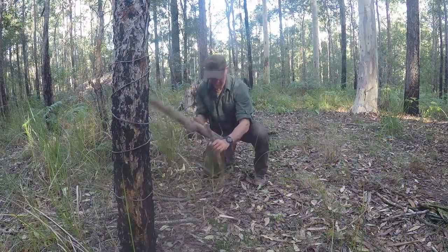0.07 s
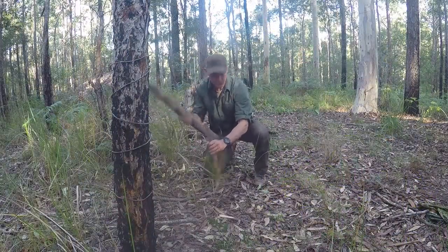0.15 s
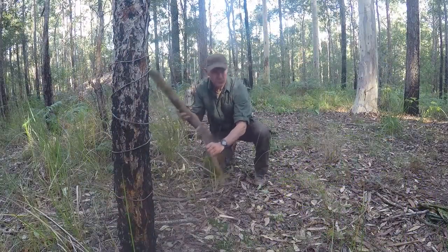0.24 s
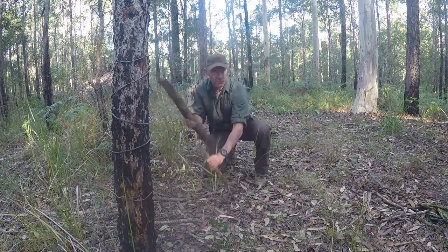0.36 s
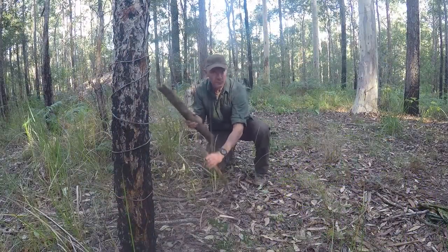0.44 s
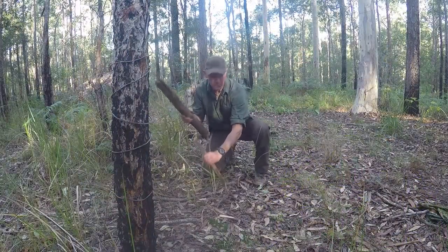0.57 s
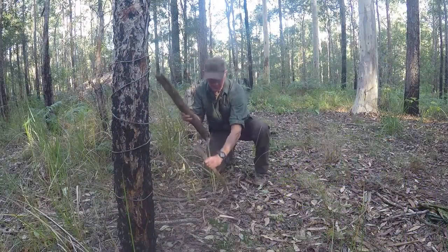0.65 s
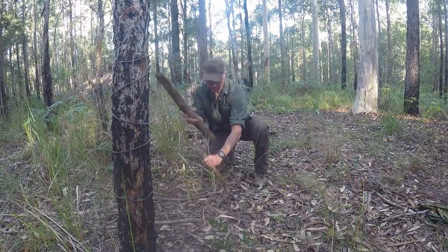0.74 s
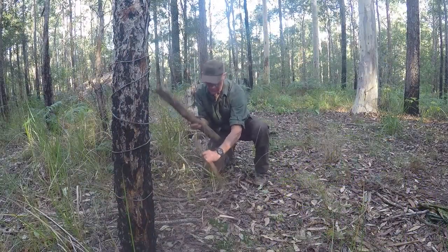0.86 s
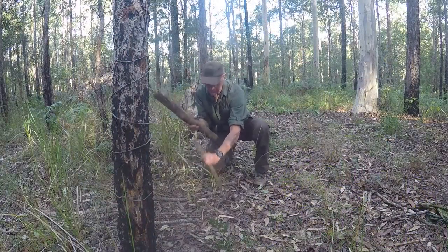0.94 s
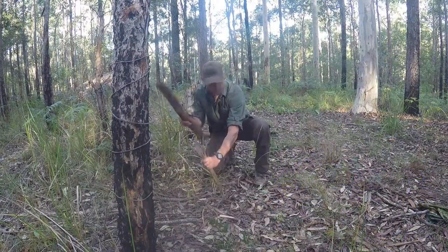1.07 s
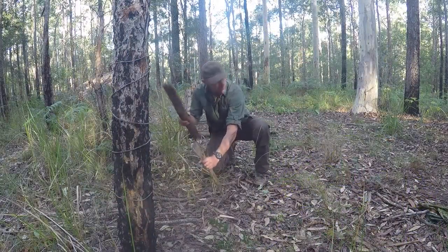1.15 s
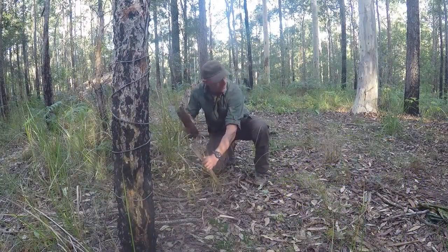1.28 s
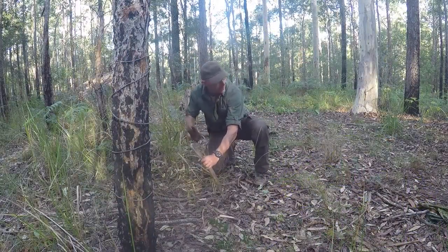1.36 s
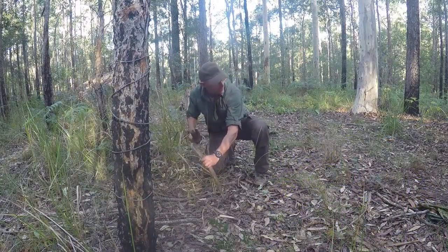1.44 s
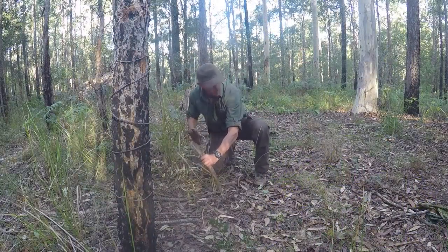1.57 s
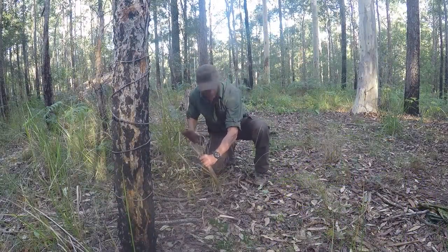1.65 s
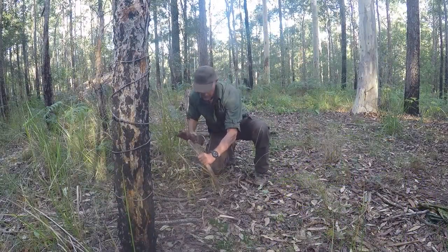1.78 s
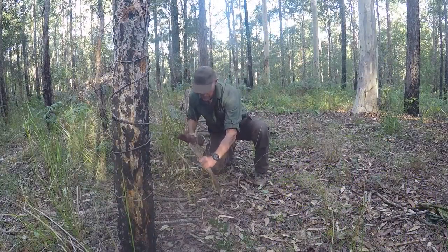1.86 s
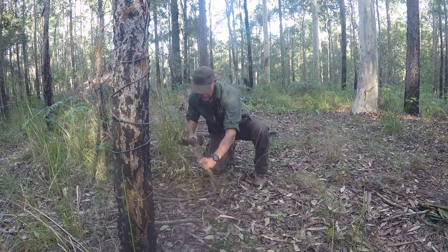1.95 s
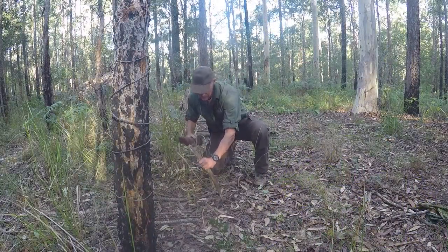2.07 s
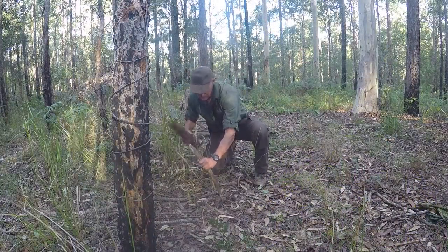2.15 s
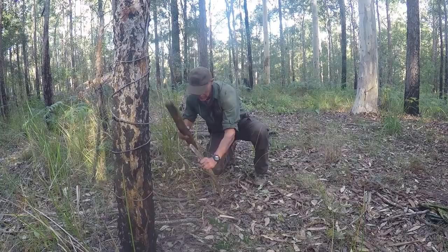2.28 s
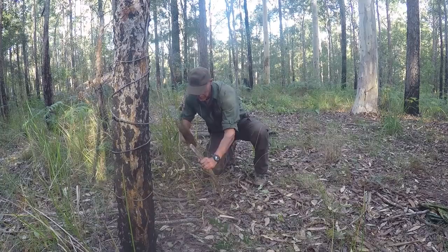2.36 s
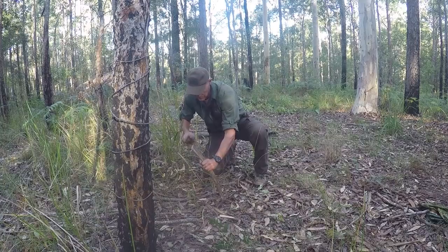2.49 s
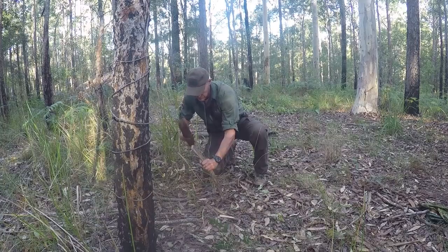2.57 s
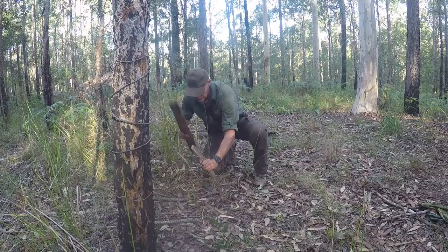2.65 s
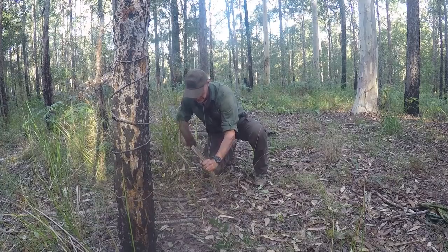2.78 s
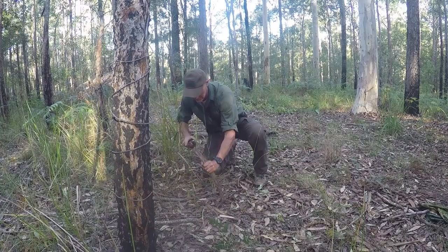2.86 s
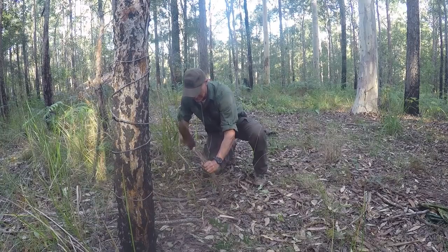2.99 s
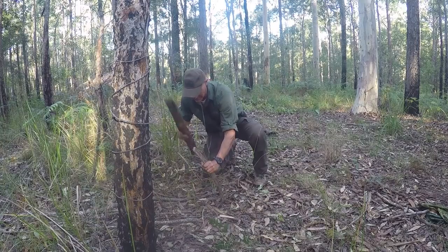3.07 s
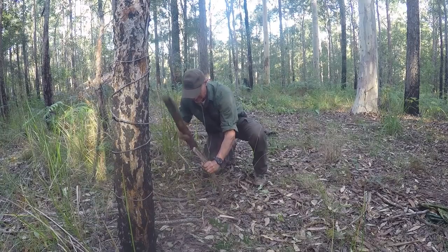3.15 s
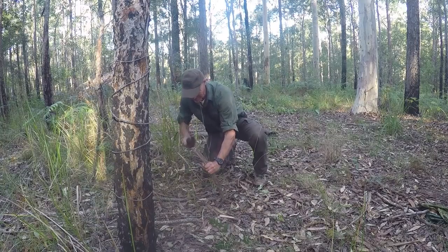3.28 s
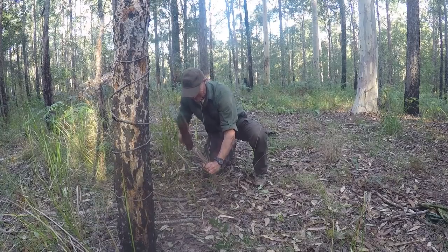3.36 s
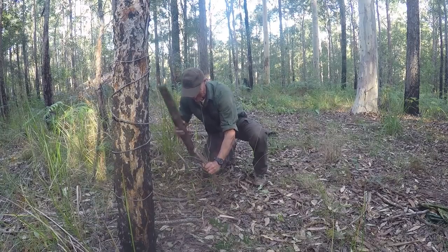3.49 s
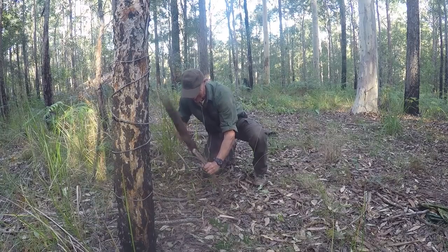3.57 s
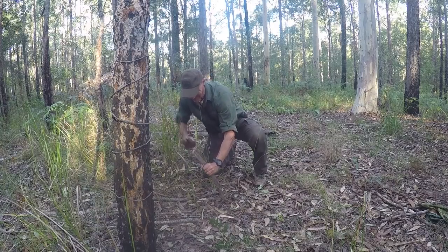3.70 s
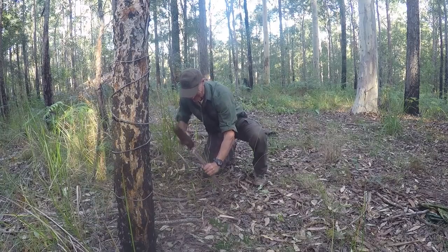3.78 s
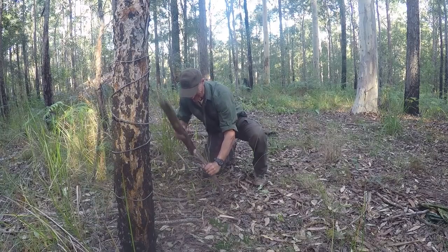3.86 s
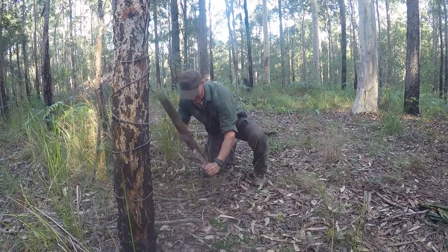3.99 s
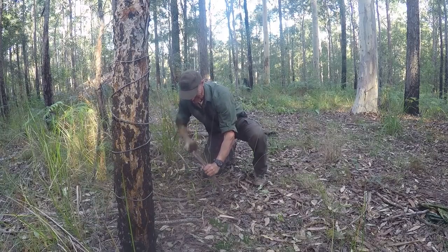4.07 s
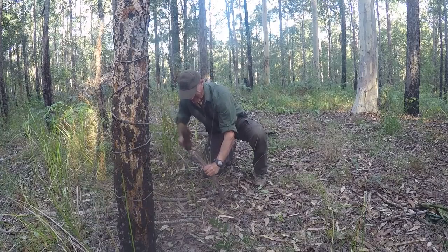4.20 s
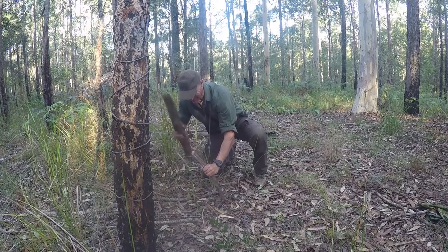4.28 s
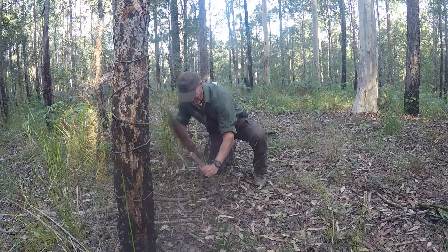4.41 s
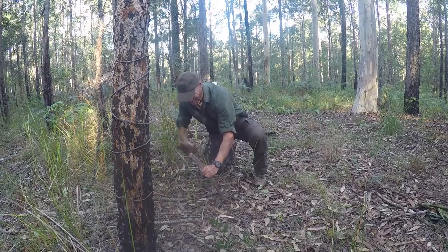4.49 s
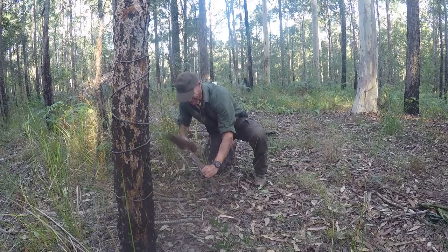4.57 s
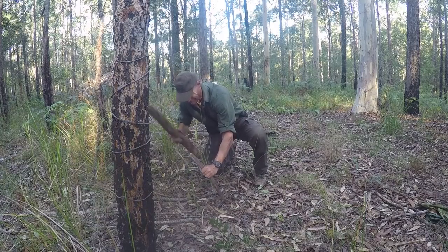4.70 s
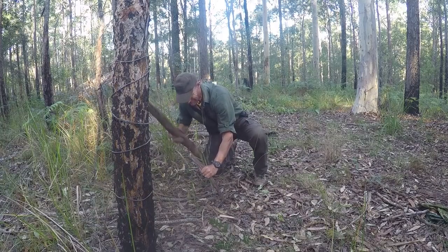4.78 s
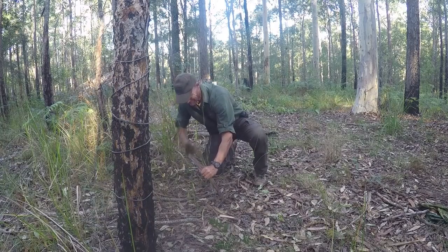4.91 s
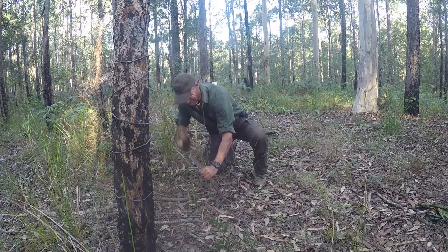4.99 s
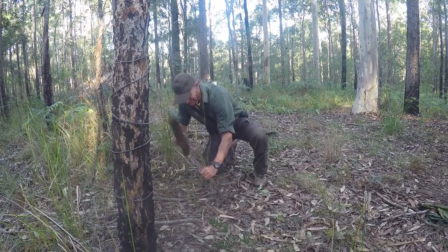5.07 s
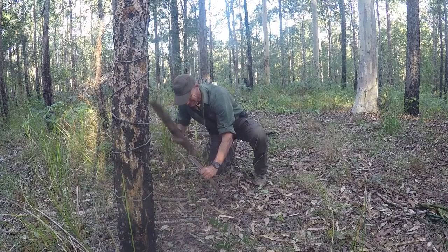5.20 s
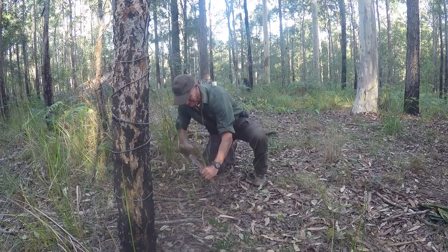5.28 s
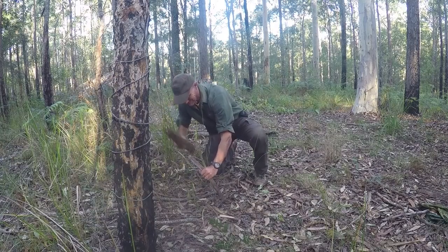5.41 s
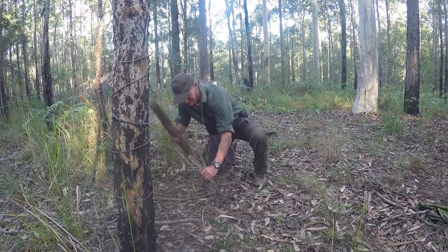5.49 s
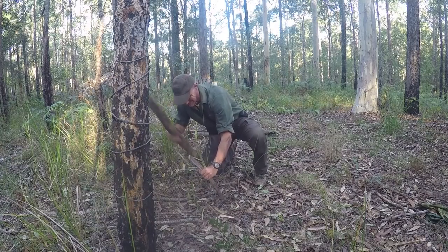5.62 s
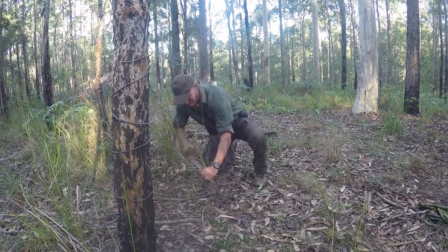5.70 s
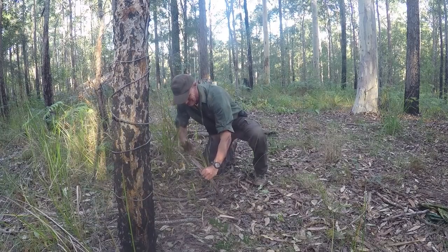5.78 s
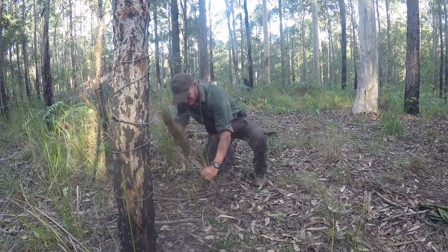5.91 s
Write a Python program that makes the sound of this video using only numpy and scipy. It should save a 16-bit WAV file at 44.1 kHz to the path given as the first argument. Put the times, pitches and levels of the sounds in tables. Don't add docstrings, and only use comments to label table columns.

```python
import sys
import numpy as np
from scipy import signal
from scipy.fft import rfft, irfft, next_fast_len
from scipy.io import wavfile

SR = 44100
rng = np.random.default_rng(int(sys.argv[2]) if len(sys.argv) > 2 else 0)


def voltage_ratio(decibels):
    exponent = np.asarray(decibels, float) / 20
    return 10 ** exponent


def store_pcm(level_fs):
    pcm = np.round(np.clip(level_fs, -1, 1) * 32767).astype(np.int16)
    wavfile.write(sys.argv[1], SR, np.atleast_2d(pcm).T)


N = 262306
STOP_S = 5.7625

# start_s, peak_db, stick_head_db, grip_db, stake_ring_db
BLOWS = [
    (2.455, -7.5, 1.5, -13, 0.5),
    (2.8468, -4, 0.5, -8, 0.5),
    (3.2651, -3.5, 4, -1, -1),
    (3.6798, -4.5, -5, 0.5, -4.5),
    (4.0919, -4, -5, 3.5, -1),
    (4.5034, -4, 4, 1, -2.5),
    (4.9103, -2.5, 1.5, 1, -12),
    (5.318, -1.5, -3.5, 1.5, 0),
    (5.745, -4, -2.5, 2.5, -0.5),
]


def rms_one(x):
    return x / np.sqrt(np.mean(x ** 2) + 1e-20)


def drift(rate_hz):
    points = rng.standard_normal(int(N / SR * rate_hz) + 3)
    return np.interp(np.arange(N) / SR * rate_hz, np.arange(len(points)), points)


def clicks(times_s, gains):
    out = np.full(N, 1e-18)
    np.add.at(out, np.round(np.asarray(times_s) * SR).astype(int), gains)
    return out


def ring(x, hz, t60_s):
    radius = voltage_ratio(-60 / (t60_s * SR))
    angle = 2 * np.pi * hz / SR
    return signal.lfilter([0, np.sin(angle)], [1, -2 * radius * np.cos(angle), radius * radius], x)


def colour(x, spectrum):
    hz, level_db = np.transpose(spectrum)
    size = next_fast_len(len(x))
    bins_hz = np.arange(size // 2 + 1) * SR / size + 1
    gain = voltage_ratio(np.interp(np.log(bins_hz), np.log(hz), level_db))
    return rms_one(irfft(rfft(x, size) * gain, size)[:len(x)])


def dying(times_s, gains, t60_s, rise_ms):
    fall = voltage_ratio(-60 / (t60_s * SR))
    rise = np.exp(-1000 / (rise_ms * SR))
    falling = signal.lfilter([1], [1, -fall], clicks(times_s, gains))
    return signal.lfilter([1 - rise], [1, -rise], falling)


def patchy(x, depth_db, rate_hz):
    edges_hz = [20, 1000, 2000, 3500, 5500, 8000, 20000]
    size = next_fast_len(N)
    spectrum = rfft(x, size)
    bins_hz = np.arange(size // 2 + 1) * SR / size
    out = 0
    for low, high in zip(edges_hz, edges_hz[1:]):
        band = irfft(spectrum * (bins_hz >= low) * (bins_hz < high), size)[:N]
        out = out + band * voltage_ratio(depth_db * drift(rate_hz))
    return out


def forest():
    # pitch_hz, level_db_per_hz
    hiss_spectrum = [(88, -42.5), (150, -6.5), (300, -7), (334, -4), (365, -5.5), (510, -8), (570, -15.5),
                     (1260, -21), (2100, -18.5), (5300, -21), (5900, -26.5), (8900, -35), (14800, -37.5),
                     (16000, -46.5)]
    # pitch_hz, level_db_per_hz
    rumble_spectrum = [(8.8, -22), (15, 1.5), (27, 3), (49, 5.5), (86, 3), (111, -4.5), (130, -7),
                       (200, -30.5), (260, -47), (440, -120)]
    # time_s, top_hiss_change_db
    breeze = [
        (0, 6.5),
        (1.5, 6.5),
        (1.95, 3),
        (5.76, 3.5),
    ]
    # time_s, change_db
    swell = [
        (0, -3),
        (.45, -2),
        (1.2, 1.5),
        (2.2, -1.6),
        (3.2, 1.5),
        (4.4, 1.5),
        (5.76, -4.5),
    ]
    hiss_db, rumble_db, murmur_db = -42, -32.5, 1.16
    t = np.arange(N) / SR
    hiss = colour(rng.standard_normal(N), hiss_spectrum)
    murmur = signal.sosfiltfilt(signal.butter(2, 560, fs=SR, output="sos"), hiss)
    top = signal.sosfiltfilt(signal.butter(2, 7000, "high", fs=SR, output="sos"), hiss)
    middle = (hiss - murmur - top) * voltage_ratio(0.21 * drift(2.2))
    murmur = murmur * voltage_ratio(murmur_db + 1.24 * drift(12))
    top = top * voltage_ratio(np.interp(t, *np.transpose(breeze)) + 0.79 * drift(13))
    lumps_db = np.interp(t, *np.transpose(swell)) + 0.58 * drift(26)
    rumble = voltage_ratio(rumble_db + lumps_db) * colour(rng.standard_normal(N), rumble_spectrum)
    return rumble + voltage_ratio(hiss_db) * (murmur + middle + top)


def snaps(rows, cycles, click_ms, spread, click_db):
    t = np.arange(SR // 20) / SR
    out = np.zeros(N + len(t))
    crack = 7 * (t == 0)
    for (start_s, peak_db, hz), white in zip(rows, rng.standard_normal((len(rows), len(t)))):
        band_hz = [hz / spread, min(hz * spread, .4 * SR)]
        puff = signal.lfilter(*signal.butter(1, band_hz, "band", fs=SR), white + crack)
        click = voltage_ratio(click_db - 14.5 - 60000 * t / click_ms) * rms_one(puff)
        tone = voltage_ratio(-6 - 60 * t * hz / cycles) * np.sin(2 * np.pi * hz * t)
        i = int(start_s * SR)
        out[i:i + len(t)] += voltage_ratio(peak_db) * (tone + click)
    return out[:N]


def strays():
    per_s, lowest_db, lowest_hz = 7, -40, 4000
    luck = rng.random((int(per_s * STOP_S), 3))
    rows = luck * [STOP_S, 8, 9000] + [0, lowest_db, lowest_hz]
    return snaps(rows, 19, 6, 1.6, click_db=5)


def settling_leaves():
    # start_s, peak_db, ring_hz
    ticks = [(1.7106, -23, 4100), (1.7689, -22, 4550), (1.8002, -22, 3100), (1.8445, -23, 6000),
             (1.8538, -22, 4030), (1.9173, -25, 6000), (2.2855, -20, 4000), (2.3353, -23, 4020),
             (2.5791, -22, 4700), (2.6177, -23, 5200), (2.7026, -20, 5500), (2.9994, -32, 11000),
             (3.0828, -23, 4280), (3.529, -27.5, 5330), (3.8194, -26, 8500), (4.4596, -26, 4700),
             (4.6294, -31, 4800), (4.6683, -23, 5730), (4.6992, -22, 3400), (4.7581, -29, 5170),
             (4.8381, -19.5, 5350), (5.1761, -25.5, 5700), (5.68, -26, 5600)]
    return snaps(ticks, 25, 14, 1.4, click_db=1)


def leaf_snaps():
    # start_s, peak_db, ring_hz
    breaks = [(.324, -16, 5630), (.3502, -9.5, 5840), (.3544, -12, 5550), (.399, -16, 6100),
              (.5387, -10.5, 5960), (.5424, -17.5, 2050), (.5556, -13, 5560), (.5851, -21, 5330),
              (.62, -11.5, 5650), (.6274, -17.5, 2230), (.6408, -11.5, 5300), (.6522, -26, 2060),
              (.6874, -25, 2280), (.829, -21, 4340), (.8434, -13.5, 5550), (.8706, -25, 5380),
              (.8874, -32, 2750), (.911, -14, 5430), (.931, -28, 5430), (.9927, -17, 5200),
              (1.0013, -21, 1950)]
    return snaps(breaks, 46, 33, 1.34, click_db=-1.5)


def squeaks():
    # start_s, length_s, pitch_hz, width_hz, level_db
    slides = [
        (.622, .038, 2055, 260, -35),
        (.64, .046, 2190, 340, -32),
        (.64, .045, 3980, 500, -40),
        (.657, .023, 11300, 450, -46),
        (1.768, .032, 2020, 400, -38),
    ]
    t = np.arange(N) / SR
    out = 0
    for start_s, length_s, hz, width_hz, level_db in slides:
        t60_s = 2.9 / width_hz
        tone = ring(ring(rng.standard_normal(N), hz, t60_s), hz, t60_s)
        slide = np.sin(np.pi * np.clip((t - start_s) / length_s, 0, 1))
        out = out + voltage_ratio(level_db) * rms_one(tone) * slide
    return out


def shuffle(full_s, swell_ms, hold_ms, level_db):
    swell_db, sag_db_per_s, release_db_per_s = 17.5, 45, 452
    t = np.arange(N) / SR - full_s
    before, after = np.minimum(t, 0), np.maximum(t, 0)
    released = np.maximum(after - hold_ms / 1000, 0)
    pressed_db = level_db + swell_db * 1000 * before / swell_ms
    return pressed_db - sag_db_per_s * after - release_db_per_s * released


def rustle():
    # full_s, swell_ms, hold_ms, level_db
    shuffles = [(0.326, 3.8, 91, -26), (.45, 28, 68, -40), (.54, 42, 8.6, -26.5), (0.618, 7.7, 53, -28),
                (.71, 12, 90, -54), (.828, 74, 11, -32), (.855, 6, 84, -32), (0.995, 54, 20, -29.5),
                (1.712, 9, 54, -40.5), (1.77, 14, 24, -31.5), (1.846, 8, 12, -41), (1.918, 110, 2.7, -38.5)]
    # pitch_hz, level_db_per_hz
    leaf_spectrum = [(180, -46), (300, -6), (502, -4), (762, -13), (1430, -15.5), (2030, -1.5), (3460, -8),
                     (3890, -1.5), (4910, -8.5), (5520, 0), (10400, -16.5), (14700, -11), (16000, -26)]
    level = voltage_ratio(np.max([shuffle(*row) for row in shuffles], axis=0))
    sizes = voltage_ratio(3 * np.minimum(rng.exponential(1, N), 3.5)) * rng.choice([-1, 1], N)
    breaks_per_s = 2500 * voltage_ratio(6 * drift(60))
    breaks = sizes * (rng.random(N) < breaks_per_s / SR) + 1e-18
    pitches_hz = np.geomspace(1500, 15000, num=14)
    dealt = rng.integers(0, 14, size=N)
    grains = sum(ring(breaks * (dealt == k), hz, 3.9 / hz) * hz for k, hz in enumerate(pitches_hz))
    brush = .5 * rng.standard_normal(N) + .5 * rms_one(breaks)
    leaves = colour(rms_one(grains) + brush, leaf_spectrum)
    return voltage_ratio(-2) * level * patchy(leaves, 2.6, 45.14)


def wood_taps():
    # start_s, peak_db, ring_hz
    taps = [
        (.347, -16.5, 327),
        (.921, -25.5, 660),
        (.923, -23, 1270),
        (1.969, -20.5, 373),
        (1.972, -27, 970),
        (2.338, -25.5, 660),
        (2.342, -25, 1280),
    ]
    return snaps(taps, 30, 25, 1.4, click_db=-4)


def ground():
    wave_hz, lag_ms, rise_ms, shake_db = 72.1, 3.26, 24, -19
    t = np.arange(int(.45 * SR)) / SR
    late = t * 1000 / rise_ms
    push = voltage_ratio(-60 * t / 0.15) * np.sin(2 * np.pi * 1.27 * wave_hz * t)
    wave = voltage_ratio(-1) * (late * np.exp(1 - late)) ** 0.8 * np.sin(2 * np.pi * wave_hz * t)
    hum_swell = (t / 0.092 * np.exp(1 - t / 0.063)) ** 2.58
    hum_beat = 1 + 0.43 * np.cos(2 * np.pi * 17 * t)
    hum = voltage_ratio(-8) * hum_swell * np.sin(2 * np.pi * 128 * t) * hum_beat
    start_s, peak_db, _, grip_db, _ = np.transpose(BLOWS)
    blow_db = peak_db + grip_db + shake_db
    thud = ring(clicks(start_s + 0.00046, voltage_ratio(blow_db + 15.5)), 120, 0.012)
    shakes = clicks(start_s + lag_ms / 1000, voltage_ratio(blow_db + 7))
    return signal.fftconvolve(shakes, push + wave + hum)[:N] - thud


def trunks():
    # pitch_hz, level_db_per_hz
    scatter_spectrum = [(290, -33), (500, -9), (1100, 2.5), (1670, -4), (4200, -1), (5400, 1), (6100, -8),
                        (9000, -14.5), (15300, -20.5), (16000, -42)]
    start_s, peak_db = np.transpose(BLOWS)[:2]
    near = dying(start_s + 0.017, voltage_ratio(peak_db - 23), 0.13, 1.2) * voltage_ratio(2.3 * drift(55))
    far = dying(start_s + 0.039, voltage_ratio(peak_db - 34), 0.51, 30)
    return (near + far) * patchy(colour(rng.standard_normal(N), scatter_spectrum), 1.4, 30)


def echoes(x):
    delay_ms, level_db = 22, -19.5
    lag = int(delay_ms * SR / 1000)
    return voltage_ratio(level_db) * signal.lfilter(*signal.butter(1, 3000, fs=SR), np.pad(x, (lag, 0))[:N])


def splinters(start_s, peak_db, treble_db):
    # pitch_hz, level_db_per_hz
    fibre_spectrum = [(820, -40.5), (1400, -6.5), (2280, 0.5), (3400, -3), (6940, -7.5), (7600, -20),
                      (9510, -12), (10400, -20.5), (14700, -20.5), (16000, -30.5)]
    fibres = colour(rng.standard_normal(N), fibre_spectrum)
    dull = signal.sosfiltfilt(signal.butter(2, 3500, fs=SR, output="sos"), fibres)
    dull_burst = dying(start_s, voltage_ratio(peak_db - 6.5), 0.055, 0.77) * dull
    bright_burst = dying(start_s, voltage_ratio(peak_db + treble_db - 7.5), 0.056, 0.51) * (fibres - dull)
    return dull_burst + bright_burst


def knock():
    # delay_ms, level_db
    contacts = [
        (0, -9),
        (1.2, -6),
        (2.7, -5),
        (4.3, -4.5),
        (5.0, -5),
        (8.5, -13.5),
        (10.5, -12),
    ]
    # pitch_hz, level_db, t60_s
    wood = [(250.4, -31, 0.0043), (359.7, -13, 0.07), (440, -7, 0.097), (700, -8.5, 0.012),
            (776, -33, 0.0063), (1014, -5.5, 0.073), (1076, -34.5, 0.09), (1915, -18, 0.11),
            (2232, -15.5, 0.07), (2817, -4, 0.0067), (3200, -39.5, 0.0076), (3900, -14, 0.025),
            (5170, -16.5, 0.035), (5490, -14.5, 0.05), (6984, -19.5, 0.09), (8100, -30, 0.027),
            (9500, -33.5, .03)]
    longest_s, loss_power = .046, .36
    body_db, blow_spread_db, bounce_spread_db = 2.5, .5, 1.1
    start_s, peak_db, head_db, grip_db, stake_db = np.transpose(BLOWS)
    shaft_db = 5.5 + 0.22 * grip_db
    treble_db = 1.56 + 0.47 * grip_db
    delay_ms, bounce_db = np.transpose(contacts)
    luck = rng.standard_normal((len(start_s), len(wood) + 1, len(delay_ms) + 1))
    contact_s = (start_s[:, None] + (delay_ms - .1 + 0.065 * luck[:, -1, 1:]) / 1000).ravel()
    modes = 0
    for k, (hz, level_db, t60_s) in enumerate(wood):
        if hz < 400:
            tilt_db = body_db
        elif hz < 550:
            tilt_db = body_db + stake_db
        elif hz < 900:
            tilt_db = shaft_db
        elif hz < 1500:
            tilt_db = head_db
        elif hz > 3500:
            tilt_db = treble_db
        else:
            tilt_db = 0
        octaves = np.log2(hz / 400)
        blow_db = peak_db + tilt_db + blow_spread_db * octaves * luck[:, k, 0]
        contact_db = bounce_db + level_db + bounce_spread_db * octaves * luck[:, k, 1:]
        strength = voltage_ratio(blow_db[:, None] + contact_db)
        damped_s = min(t60_s, longest_s * (500 / hz) ** loss_power)
        modes = modes - ring(clicks(contact_s, strength.ravel()), hz, damped_s)
    modes = signal.sosfilt(signal.butter(2, 200, "high", fs=SR, output="sos"), modes)
    return modes + splinters(start_s, peak_db, treble_db)


def scene():
    leaves = strays() + settling_leaves() + leaf_snaps() + squeaks() + rustle()
    blows = knock()
    answers = ground() + trunks() + echoes(blows)
    return (forest() + leaves + wood_taps() + answers + blows)[None]


def low_pass(x):
    return signal.sosfilt(signal.butter(12, 16530, fs=SR, output="sos"), x)


def record(dry):
    limit, mic_top_hz = 1.15, 15300
    rounded = limit * np.tanh(dry / limit)
    x = signal.sosfilt(signal.ellip(10, .5, 32, mic_top_hz, fs=SR, output="sos"), rounded)
    mix = x * (np.arange(N) < STOP_S * SR)
    return low_pass(mix)


dry = scene()
out = record(dry)
store_pcm(out)
```